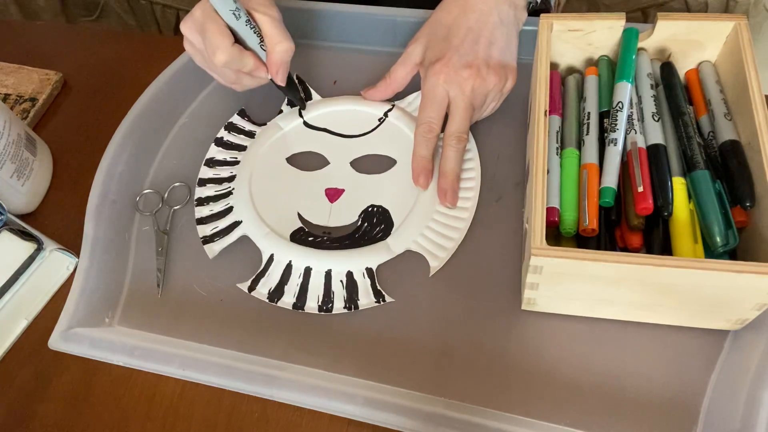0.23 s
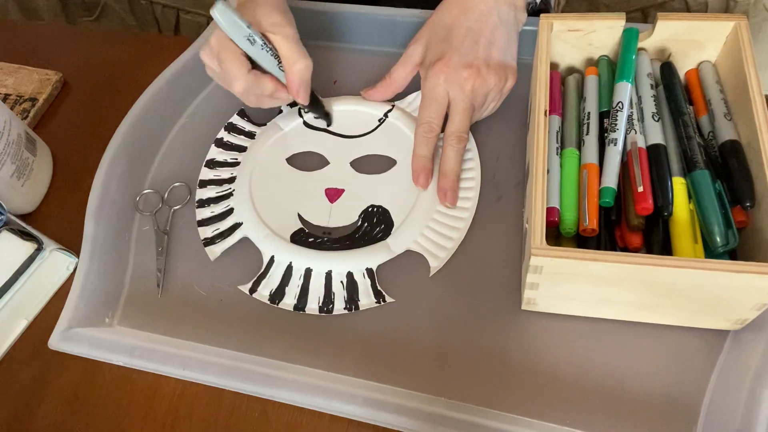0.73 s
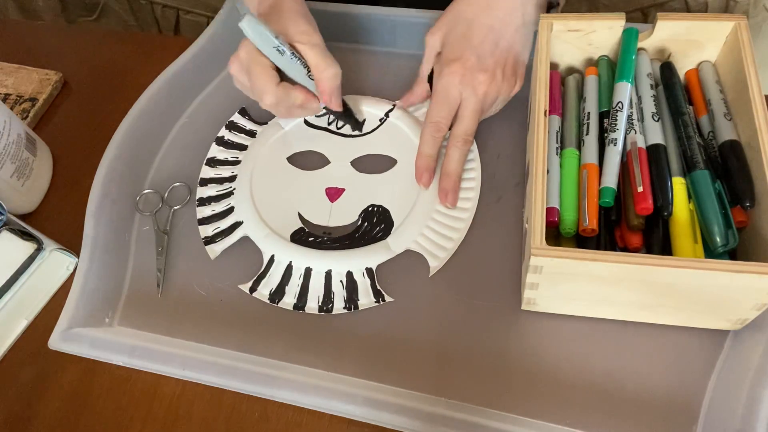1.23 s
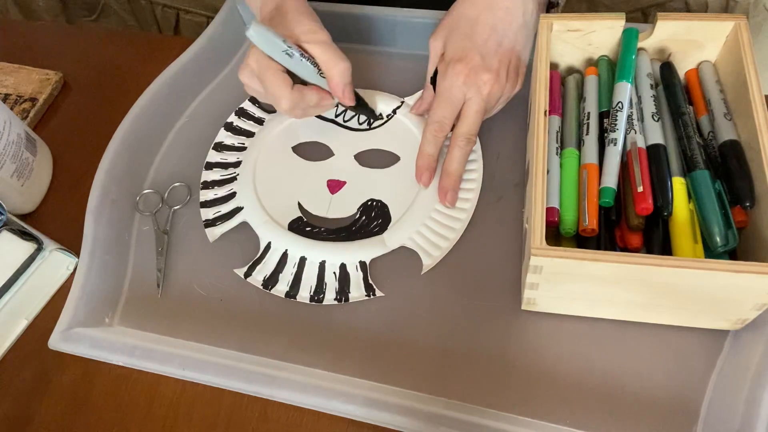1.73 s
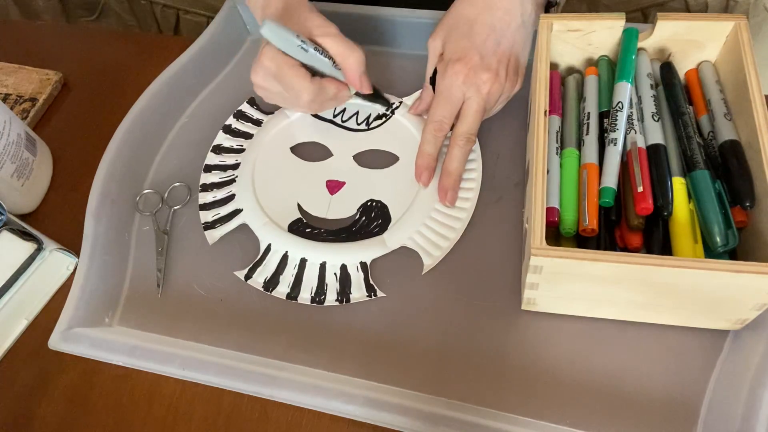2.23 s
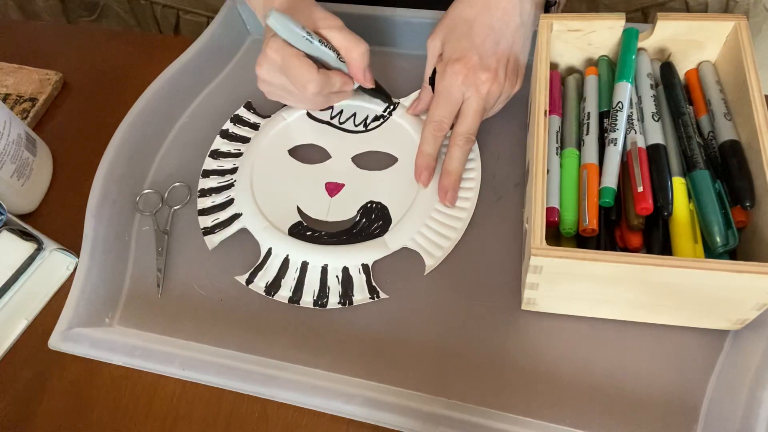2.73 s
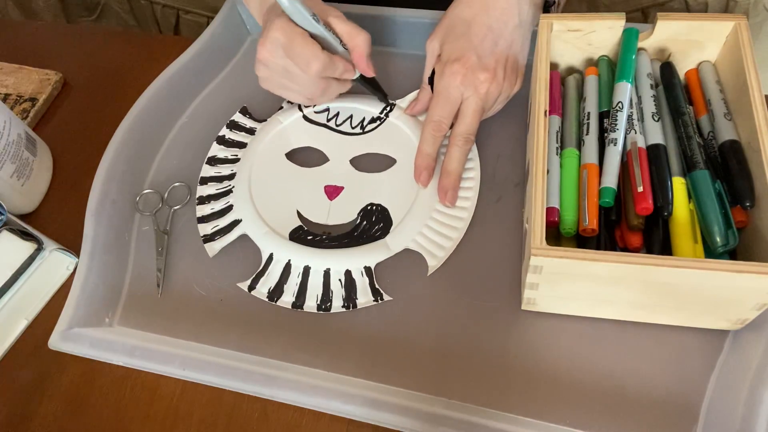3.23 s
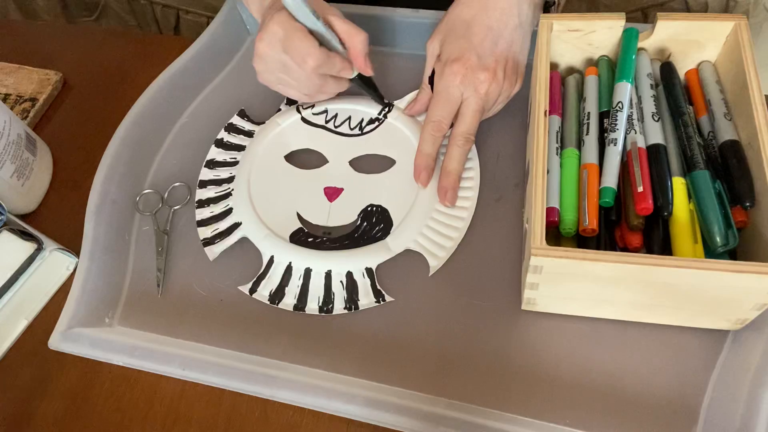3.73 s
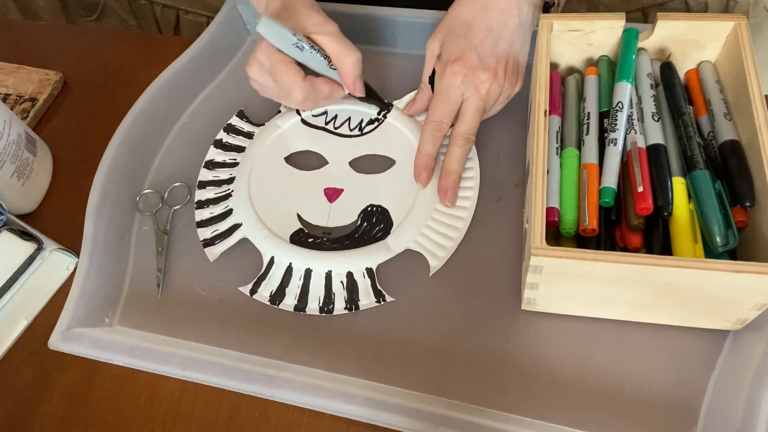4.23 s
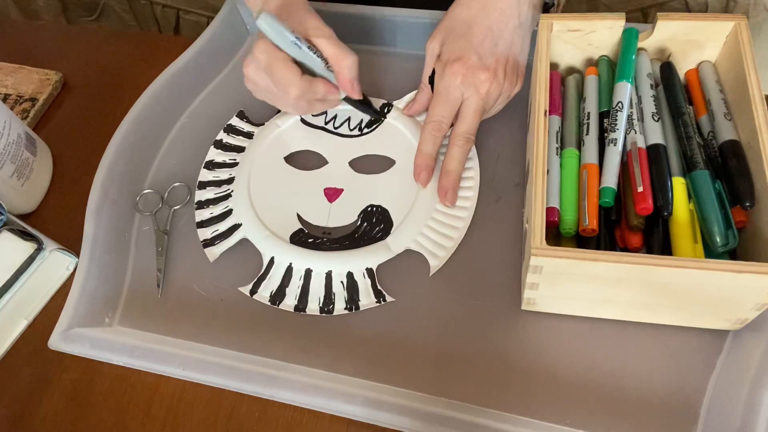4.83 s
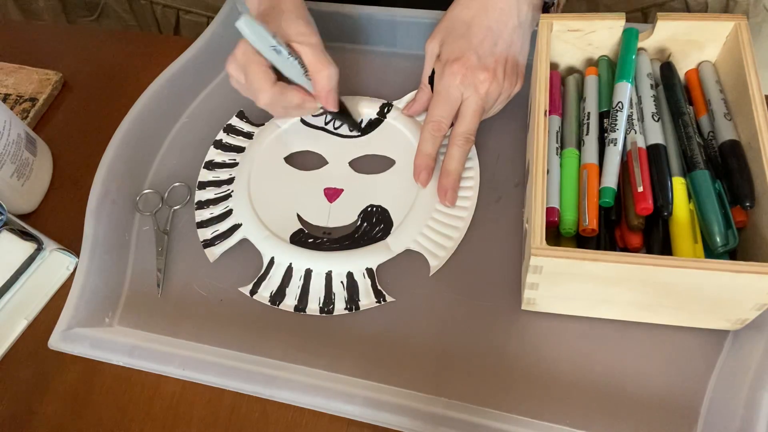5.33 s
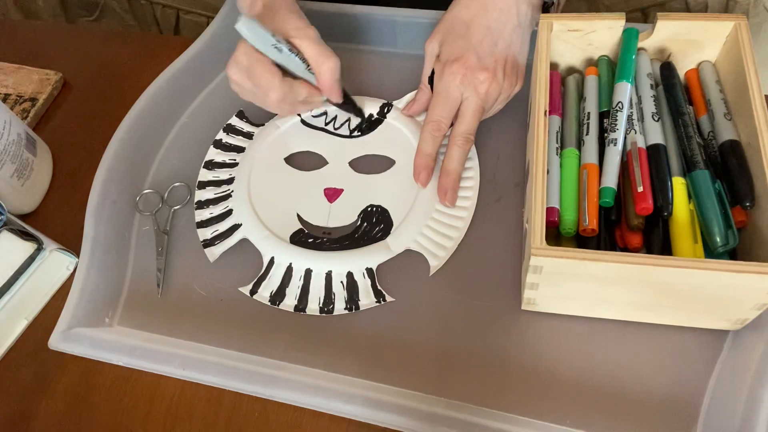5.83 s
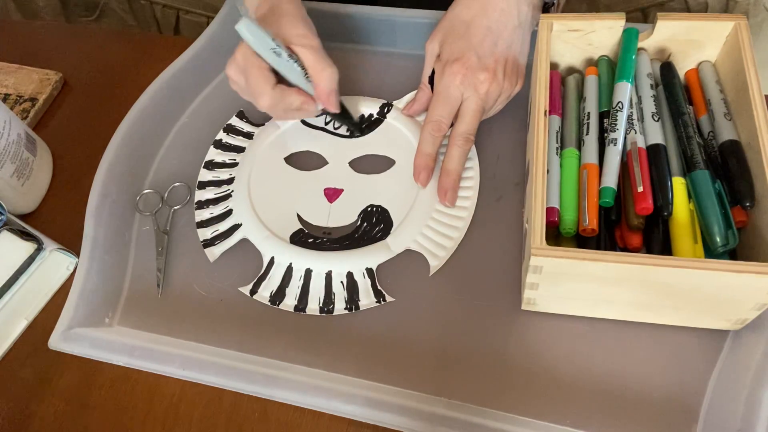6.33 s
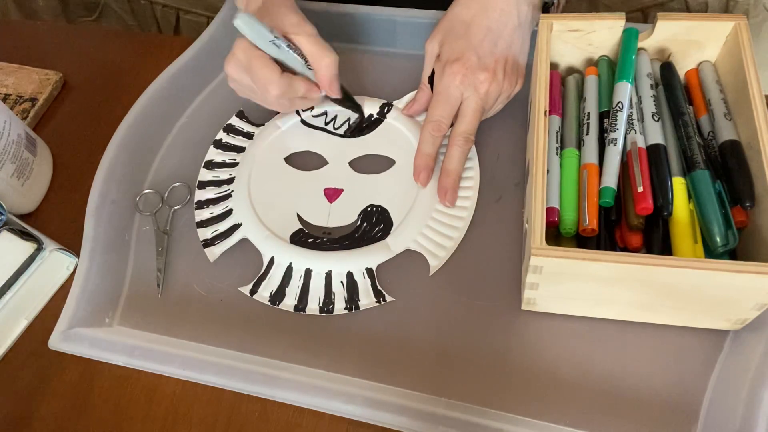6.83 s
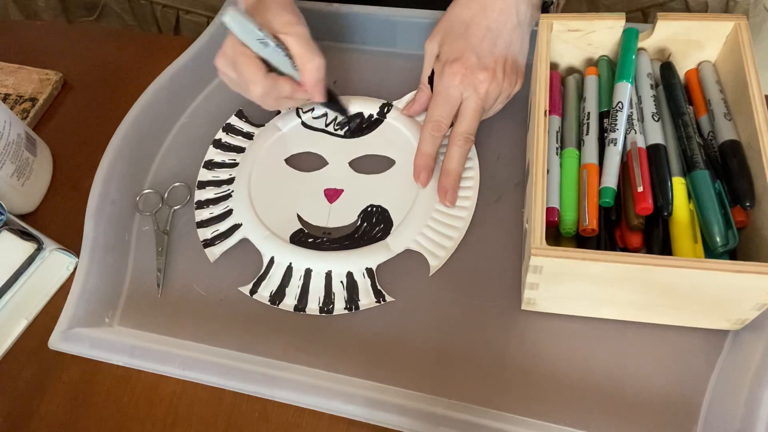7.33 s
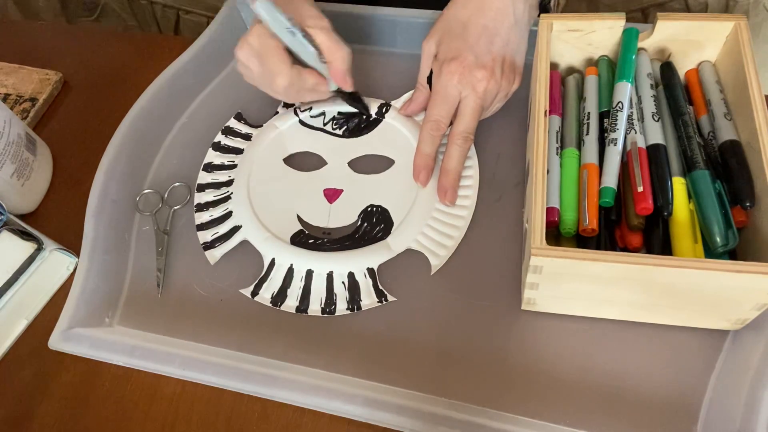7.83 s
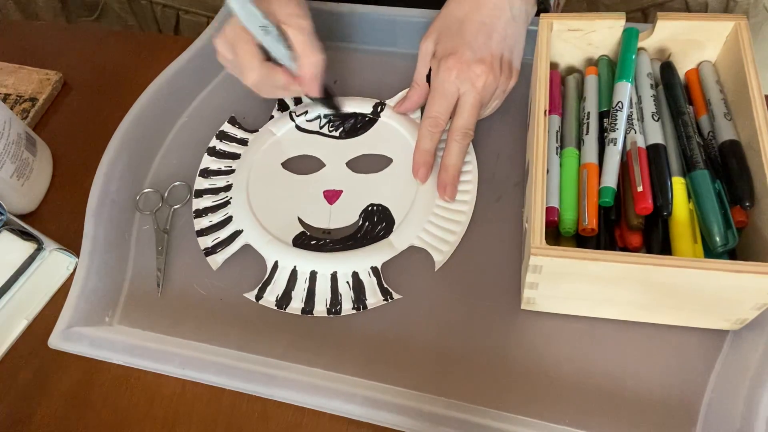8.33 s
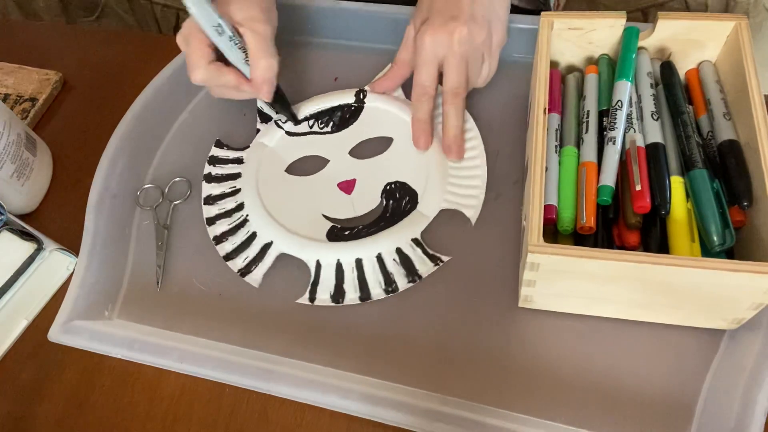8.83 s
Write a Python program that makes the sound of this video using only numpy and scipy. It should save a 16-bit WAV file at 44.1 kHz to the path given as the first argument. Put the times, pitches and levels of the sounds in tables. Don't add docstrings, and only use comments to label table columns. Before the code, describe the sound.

A close, dry stereo sound of a felt-tip marker scribbling on a paper plate resting in a plastic tray, in a quiet room. From 0 to 1.3 seconds brisk scratchy strokes alternate, some strong, around 0.5 and 1.25 s, with small ticks near 0.65 and 1.15 s. Between 1.4 and 2.4 s the strokes are lighter, with soft low tray bumps around 2 s. From 2.6 to 4.2 s they become faint and hesitant, with brief near-silences. From 4.5 s the scribbling firms up, regular and rapid through 6.3 s, then dips briefly around 6.4 s. Near 7 s the plate buckles with a hollow low pop; strong rasps follow around 7.45 to 7.8 s with a smaller pop. Dense, bright scratching continues from 8 to 9 s, with a tick near 8.9 s. Faint hum stays beneath.

```python
import sys
import numpy as np
from scipy import signal
from scipy.io import wavfile
from scipy.ndimage import uniform_filter1d

SR = 44100
rng = np.random.default_rng(int(sys.argv[2]) if len(sys.argv) > 2 else 0)


def attenuation_scalar(level_db):
    decades = np.asarray(level_db, float) / 20
    return 10 ** decades


def inscribe(sig):
    pcm = np.round(np.clip(np.atleast_2d(sig).T, -1, 1) * 32767)
    wavfile.write(sys.argv[1], SR, pcm.astype(np.int16))


N = 399987

# (time [s], level [dB])
LAST_TURN = (9.075, -49.5)


def evened(x):
    return x / np.sqrt(np.mean(x ** 2) + 1e-20)


def read(points, hz):
    f, value = np.transpose(points)
    return np.interp(np.log(hz + 1), np.log(f + 1), value)


def ports(shared, apart, hz, shift_hz=0, clear=0, facing=1):
    # (frequency [Hz], coherence [0-1])
    likeness = [(200, 0.78), (700, 0.7), (1400, 0.99), (2400, 0.65), (3300, 0.87), (5000, 0.45),
                (6300, 0.49), (7500, .96), (9000, .93), (15000, 0.96)]
    # (frequency [Hz], lead [half turns])
    left_lead = [(0, 0), (690, -.3), (1100, -.08), (3000, -.18), (3700, -.36), (4400, -.85), (4800, -.95),
                 (6100, -.88), (6500, -.7), (7000, -.28), (8100, .01), (15450, 3)]
    # (frequency [Hz], left minus right [dB])
    balance = [(60, -1.5), (550, -3), (1650, -0.1), (8000, -1)]
    hz = hz[:, None]
    alike = read(likeness, hz) + clear * np.exp(-((hz - 5500) / 1300) ** 2)
    alike = np.clip(alike, 0, .99)
    lean = attenuation_scalar(read(balance, hz) / 2)
    lead = np.exp(1j * np.pi * np.interp(hz + shift_hz * hz / 10000, *np.transpose(left_lead)))
    turned = (1 - facing) * np.exp(-((hz - 5350) / 1250) ** 4)
    lead = lead * np.exp(.8j * np.pi * turned)
    shade = attenuation_scalar(-5.0 * turned)
    left = shared * lead * lean
    right = (alike * shared + np.sqrt(1 - alike ** 2) * apart) / lean
    return shade * np.array([left, right])


def strokes():
    # (turn time [s], level at the turn [dB], early level [dB], late level [dB], plate ring under the tip [dB])
    snapped = [(0.278, -81, -47.5, -36.5, 6.5), (0.628, -57.5, -38.5, -43, 3.5),
               (0.809, -58.5, -42.5, -44.5, 1.5), (0.986, -58, -40.5, -43.5, 6),
               (1.352, -56.5, -47, -45.5, 0), (1.535, -56.5, -48.5, -52, 2.5), (2.63, -68.5, -54, -54.5, 3),
               (3.056, -64, -54.5, -56, 1.5), (3.493, -79, -51.5, -48.5, 2), (3.728, -51, -45, -50, -0.5),
               (4.16, -61, -42.5, -44.5, -1), (5.18, -67, -38.5, -41.5, 8.5),
               (5.388, -62.5, -40.5, -39, 2.5), (5.586, -61, -42.5, -38, -1), (5.791, -61, -40, -38, 3),
               (6.081, -55.5, -40, -41, 2.5), (6.297, -65, -46.5, -47, 9.5), (6.96, -59.5, -43, -36.5, 0.5),
               (7.176, -67, -41.5, -35.5, -3), (7.296, -54, -41.5, -45, 5.5), (7.445, -69.5, -42, -30, -3),
               (8.253, -39, -39.5, -36, -5.5), (8.455, -64.5, -37, -41, -1.5), (8.534, -50, -39, -36, 3)]
    # (time [s], turn [dB], early [dB], late [dB], ring [dB])
    brisk = [(0.455, -58.5, -36.5, -30, 1.5), (1.165, -58, -44, -42.5, 0.5), (1.429, -64, -47.5, -43, -1.5),
             (1.626, -70, -54, -50, 9.5), (1.756, -73.5, -46.5, -44.5, 7), (1.98, -63.5, -46, -41, -1),
             (2.316, -64, -43.5, -48.5, 1), (2.69, -63.5, -55.5, -59, 7.5), (3.14, -74, -57.5, -56.5, 5),
             (3.593, -70.5, -52, -46.5, 6), (3.858, -55, -45.5, -45, -0.5), (4.063, -54, -42.5, -47, 1.5),
             (4.256, -63.5, -44.5, -49, 1.5), (4.514, -73, -44, -37.5, 5), (4.62, -57, -43.5, -45, 7),
             (4.75, -71, -43.5, -40.5, 8.5), (4.848, -60.5, -45, -43.5, 6.5), (4.963, -68, -43, -36.5, 8),
             (5.988, -60.5, -40, -37, 0.2), (6.431, -81.5, -53.5, -49.5, 20),
             (6.557, -75, -43.5, -39.5, 10.5), (6.755, -59.5, -41, -39, -1.5),
             (7.763, -69.5, -36, -34, -4.5), (8.196, -65.5, -34.5, -41.5, 0.5)]
    # (time [s], turn [dB], early [dB], late [dB], ring [dB])
    eased = [(0.148, -51.5, -38, -56, -2.5), (0.92, -38.5, -38.5, -37, 2), (1.252, -56, -31.5, -37.5, 6.5),
             (1.872, -61, -46.5, -45.5, 4), (2.103, -57, -40.5, -45.5, 2), (2.818, -69.5, -43.5, -47.5, -3),
             (2.886, -47, -43, -60, 6), (3.281, -82.5, -49, -46.5, 3), (3.415, -62.5, -52, -55.5, 13),
             (3.8, -69, -50.5, -56, 2.5), (3.977, -54, -45, -58.5, 3.5), (5.055, -54.5, -41.5, -41, 5.5),
             (5.269, -56.5, -43, -44, 5.5), (5.464, -51.5, -41, -40.5, 4.5), (5.671, -54.5, -39, -41.5, 6),
             (5.873, -52, -41.5, -42.5, 3), (6.175, -53, -35.5, -47, 11.5), (6.845, -50.5, -39, -43.5, 2),
             (7.05, -55, -41, -45.5, 6.5), (7.594, -58.5, -39.5, -37.5, 3), (8.297, -52, -36, -40.5, 3),
             (8.662, -40.5, -34, -36, 6), (8.87, -50.5, -38.5, -38.5, 4), (8.977, -52.5, -39.5, -39, 1.5)]
    # (time [s], turn [dB], early [dB], late [dB], ring [dB])
    crept = [(0.084, -85, -46, -55, 5.5), (0.354, -41.5, -39.5, -43, -2.5), (0.552, -43, -38, -52, -4),
             (0.714, -51, -39.5, -40.5, -1), (1.07, -43.5, -43, -42, 3), (2.201, -57.5, -42.5, -42.5, 2),
             (2.392, -46, -46.5, -41, 4.5), (2.502, -51.5, -35, -50, 3.5), (2.946, -51, -41, -41, 5.5),
             (4.335, -68.5, -43, -46, 6.5), (6.648, -58.5, -42.5, -45, 8.5),
             (7.941, -64.5, -47.5, -34, 3.5), (8.033, -41.5, -36, -41, -7), (8.744, -39.5, -39, -37, 8)]
    # (snapped [ms], brisk [ms], eased [ms], crept [ms])
    speed_up_ms = (5, 10.5, 23, 45)
    # (snapped [ms/dB], brisk [ms/dB], eased [ms/dB], crept [ms/dB])
    brake_ms_per_db = (1.77, 1.9, 1.77, 1.62)
    rows = []
    for kind, rise_ms, pace in zip((snapped, brisk, eased, crept), speed_up_ms, brake_ms_per_db):
        rows += [(*row, rise_ms, pace) for row in kind]
    return np.transpose(sorted(rows))


def tip_speed_db():
    # (middle time [s], length [s], level [dB])
    presses = [(0.304, 0.023, 3.5), (0.333, 0.01, 2.5), (0.456, 0.012, 4), (0.524, 0.019, -5.5),
               (0.63, 0.017, 2.5), (0.652, 0.021, -2), (0.807, 0.018, 7.8), (0.883, 0.021, 4.5),
               (0.962, 0.013, 7), (1.257, 0.01, 6), (1.26, 0.01, -2), (1.473, 0.03, 3.7),
               (1.503, 0.017, -3.5), (2.034, 0.025, 5), (2.115, 0.021, 0.5), (2.528, 0.041, -0.5),
               (4.133, 0.024, 6), (4.174, 0.026, 2.5), (4.41, 0.047, 2), (5.074, 0.011, -1),
               (5.254, 0.03, -0.5), (5.58, 0.017, -2.7), (5.602, 0.014, 3.1), (5.65, 0.022, 10.5),
               (6.052, 0.015, 4.5), (6.2, 0.017, -5.5), (6.328, 0.042, 4), (6.822, 0.032, 4),
               (6.902, 0.013, 3.5), (7.024, 0.012, 11), (7.27, 0.01, 6), (7.339, 0.043, 2),
               (7.437, 0.0085, 6.7), (7.484, 0.016, 0), (7.65, 0.047, 3.2), (7.83, 0.022, 2.9),
               (7.871, 0.026, -4), (7.996, 0.019, 5), (8.038, 0.019, 1), (8.124, 0.018, 1.5),
               (8.195, 0.011, -10), (8.218, 0.013, -4.5), (8.263, 0.011, 2.5), (8.287, 0.043, 4.6),
               (8.53, 0.02, -1), (8.643, 0.023, -6.6), (8.879, 0.01, -3), (8.921, 0.045, 1),
               (8.95, 0.011, 5.5), (9.034, 0.013, -0.5)]
    brake_ms, brake_share = 4.6, 0.52
    s, turn_db, early_db, late_db, _, rise_ms, pace = strokes()
    end, end_db = np.append(s[1:], LAST_TURN[0]), np.append(turn_db[1:], LAST_TURN[1])
    fall_s = (brake_ms + pace * abs(late_db - end_db)) / 1000
    fall_s = np.minimum(fall_s, brake_share * (end - s))
    t = np.arange(N) / SR
    k = np.clip(np.searchsorted(s, t) - 1, 0, None)
    moving, braking = s[k] + rise_ms[k] / 1000, end[k] - fall_s[k]
    run = np.clip((t - moving) / np.maximum(braking - moving, 1 / SR), 0, 1)
    tear_db = .18 * (early_db[k] - turn_db[k]) * np.exp(-abs(t - s[k]) / .012)
    level = early_db[k] + run * (late_db[k] - early_db[k]) + tear_db
    for middle, length, db in presses:
        near = slice(round((middle - .1) * SR), round((middle + .1) * SR))
        level[near] += db * np.exp(-(2 * (t[near] - middle) / length) ** 2)
    still = np.clip((moving - t) / (moving - s[k]), 0, 1) ** 2
    stopped = 1 - np.clip((end[k] - t) / (end[k] - braking), 0, 1) ** 2
    return level + still * (turn_db[k] - level) + stopped * (end_db[k] - level)


def slips(per_s, spread_db, hiss):
    force = attenuation_scalar(spread_db * np.minimum(rng.exponential(1, N), 3.6)) * rng.choice([-1, 1], N)
    slip = force * (rng.random(N) < per_s / SR)
    clumps_db = 1.0 * evened(uniform_filter1d(rng.standard_normal(N), size=130))
    return attenuation_scalar(clumps_db) * (evened(slip) + hiss * rng.standard_normal((2, N)))


def plate_db(t, speed_db):
    # (frequency [Hz], density [dB per Hz])
    paper = [(200, -13), (500, -17), (1000, -10.5), (1500, -7), (2300, -8.5), (2900, 0.5), (4000, 0),
             (5000, 0.5), (6600, -2), (8500, 1), (11000, -3), (13500, -5), (14800, -10.5), (15900, -6)]
    # (frequency [Hz], width [Hz], level above the scratch [dB], share of the ring followed [ratio])
    plate = [(555, 196, 5.5, 0.61), (920, 140, 2.5, 0.88), (1302, 49, 5.5, -0.024), (1850, 190, 4, 0.098),
             (2570, 150, 3, -0.3), (3215, 220, 1, 0.53), (3874, 98, 4, 0.11), (5890, 710, 5.5, -0.052),
             (7460, 1210, 4.5, 0.36)]
    # (time [s], dish lifted off the tray [dB], felt dragging on dry paper [dB])
    tip = [(0.1, -1.5, -10.5), (0.33, -14.5, -6.5), (0.6, -3, -6.5), (1.0, -2, -2.5), (1.33, -1, -7),
           (1.5, -6.5, -5.5), (2.2, -10.5, -1), (3.0, -7, -4), (3.5, -9, -2.5), (4.25, -13.5, -2),
           (4.7, -6.5, -1.5), (5.3, -4.5, 0), (6.05, -7.5, 0), (6.5, -7, 0.5), (7.5, -8, -4),
           (8.2, -4.5, -5.5), (8.45, 3.5, -5.5), (9.07, -8, -0.5)]
    # (middle time [s], length [s], frequency [Hz], level above the rest [dB])
    singing = [(0.49, 0.083, 3870, 7), (0.497, 0.053, 6140, 8.5), (0.328, 0.13, 2640, 7.5),
               (0.578, 0.08, 13000, 7), (0.646, 0.029, 3680, 13.5), (0.882, 0.035, 1840, 23),
               (0.884, 0.026, 2230, 7), (0.76, 0.047, 4100, 7), (6.114, 0.068, 6200, 2),
               (1.102, 0.073, 12800, 2), (0.885, 0.042, 1260, 23.5), (0.888, 0.035, 920, 18),
               (0.964, 0.019, 1660, 21), (1.051, 0.07, 1740, 16), (1.286, 0.073, 2640, 12.5),
               (2.733, .2, 8000, -1), (2.746, 0.24, 1410, 10), (2.874, 0.089, 7900, 9.5),
               (3.4, 0.93, 1380, 5), (3.76, 0.47, 2970, 7), (4.464, 0.043, 1540, 9), (4.57, 0.04, 1460, 9),
               (4.757, 0.055, 1590, 10), (4.998, 0.091, 1630, 7), (5.023, 0.029, 1350, 14.5),
               (5.143, 0.03, 1800, 10), (5.192, 0.028, 1790, 9.5), (5.356, 0.021, 1790, 16),
               (2.1, .2, 13000, 0), (7.667, 0.095, 6060, 7.5), (6.146, .03, 1750, 11),
               (6.189, 0.033, 924, 22), (6.194, 0.049, 1740, 15), (6.35, 0.089, 1770, 6),
               (6.476, 0.12, 1740, 9), (6.583, 0.13, 1820, 8), (6.713, 0.13, 1770, 5.5),
               (6.83, 0.23, 3670, 3.5), (6.938, 0.046, 1850, 12), (8.933, 0.08, 8500, 6.5),
               (7.307, 0.1, 4200, 7), (7.366, 0.12, 1800, 4.5), (7.53, 0.039, 4280, 11.5),
               (7.553, 0.079, 6000, 7), (7.807, 0.06, 4080, 6.5), (8.339, 0.058, 8000, 8),
               (8.71, 0.037, 8100, 4), (8.808, 0.051, 8350, 8.5), (8.884, 0.026, 3400, 0)]
    singing_octaves = .22
    hz = np.fft.rfftfreq(512, 1 / SR)[:, None]
    octave = np.log2(hz / 1000 + .01)

    def below(edge):
        return 1 / (1 + np.exp(13.0 * (octave - edge)))

    turn, _, _, _, ring_db, _, _ = strokes()
    ring = np.interp(t, (turn + np.append(turn[1:], LAST_TURN[0])) / 2, ring_db)
    s, lifted, dry_felt = np.transpose(tip)
    flex = np.interp(t, s, lifted) + ring
    hiss = np.interp(t, s, dry_felt) - 0.33 * ring
    field = read([(90, -11.5)] + paper, hz) + flex * below(0.042)
    field = field + 0.85 * ring * (below(1.29) - below(0.29)) + hiss * (1 - below(2.513))
    field += 0.12 * (speed_db - uniform_filter1d(speed_db, size=90)) * (1 - below(3.2))
    stroke = np.clip(np.searchsorted(turn, t) - 1, 0, None)
    chance = rng.standard_normal((len(turn), len(plate), 2))[stroke]
    for k, (mode_hz, width, db, share) in enumerate(plate):
        centre = mode_hz * (1 + 0.035 * chance[:, k, 0])
        mode_db = db + share * ring + 2.2 * chance[:, k, 1]
        field += mode_db * np.exp(-(1.73 * (hz - centre) / width) ** 2)
    for middle, length, mode_hz, db in singing:
        moment = np.exp(-(2 * (t - middle) / length) ** 4)
        field += db * moment * np.exp(-((octave - np.log2(mode_hz / 1000)) / singing_octaves) ** 2)
    patches = rng.standard_normal((len(t), len(hz))).T
    patches = uniform_filter1d(uniform_filter1d(patches, size=3, axis=0), size=16, axis=1)
    return field + 3.2 * evened(patches)


def marker():
    # (start [s], end [s])
    in_view = [
        (0, .9),
        (1.9, 4.3),
        (7.1, 8.3),
    ]
    # (time [s], share of the full lag [ratio])
    tip_facing = [
        (0, .2),
        (.9, .3),
        (1.8, .9),
        (2.2, 1.05),
        (4.1, 1.05),
        (4.7, .75),
        (6.7, .6),
        (7.2, 1),
        (8.2, .9),
        (8.8, .5),
    ]
    hz, t, z = signal.stft(slips(4500, 3.2, 1.5), SR, nperseg=512, noverlap=384)
    z[1] *= np.exp(2j * np.pi * rng.random(z[1].shape))
    speed_db = tip_speed_db()
    colour = attenuation_scalar(plate_db(t, speed_db[np.minimum((t * SR).astype(int), N - 1)]))
    colour /= np.sqrt((colour[12:] ** 2).mean(0))
    shift_hz = 190 * evened(uniform_filter1d(rng.standard_normal(len(t)), size=40))
    clear = .36 * sum((t > start) & (t < end) for start, end in in_view)
    facing = np.interp(t, *np.transpose(tip_facing))
    spectra = ports(z[0], 2.29 * z[1], hz, shift_hz, clear, facing) * colour
    scratch = signal.istft(spectra, nperseg=512, noverlap=384)[1][:, :N]
    scratch = evened(scratch) * attenuation_scalar(speed_db + 0.5)
    tail = rng.standard_normal((2, 9000)) * attenuation_scalar(-60 * np.arange(9000) / SR / .22)
    tail = signal.lfilter([1], [1, -.9], tail)
    tail /= np.linalg.norm(tail[0])
    return scratch + attenuation_scalar(-11.0) * signal.oaconvolve(scratch, tail, axes=1)[:, :N]


def ticks():
    # (time [s], level [dB], ring frequency [Hz])
    releases = [(0.6343, -24, 3540), (0.6638, -25, 3030), (1.1358, -24.5, 2700), (1.265, -24, 2440),
                (5.5866, -25, 1800), (5.7975, -29.5, 1690), (6.5622, -29, 1670), (6.9606, -29.5, 1770),
                (7.4464, -31.5, 1240), (7.7682, -37, 3860), (0.306, -35, 2900), (0.341, -33, 2700),
                (2.03, -37, 3440), (7.657, -41, 885), (8.062, -40, 1200), (8.681, -30, 2940),
                (8.887, -25, 3200)]
    rise_cycles, fade_cycles = 0.051, 7.6
    out, t = np.zeros(N), np.arange(1200) / SR
    for s, db, hz in releases:
        cycles = hz * t
        shape = (1 - np.exp(-cycles / rise_cycles)) * np.exp(-cycles / fade_cycles)
        sound = shape * (np.sin(2 * np.pi * cycles) + 0.19 * np.sin(2 * np.pi * 1.2 * cycles))
        out[round(s * SR):][:len(t)] += attenuation_scalar(db - 7.0) * sound
    return out * attenuation_scalar([[-.8], [.8]])


def pops():
    # (time [s], low thump level [dB], ring frequency [Hz], t60 [s], upper modes above the thump [dB])
    buckles = [(0.015, -62.5, 258, 0.063, -36), (0.662, -69, 274, 0.14, 19),
               (1.135, -58.5, 150, 0.093, 11.5), (4.967, -62.5, 282, 0.12, 12),
               (5.182, -61, 248, 0.13, -10), (6.177, -53.5, 274, 0.075, 9), (6.972, -31.5, 217, 0.094, -2),
               (7.444, -60, 275, 0.052, -4), (7.655, -52, 204, 0.074, 7.5),
               (7.765, -45.5, 212, 0.075, -2.5), (8.059, -54.5, 279, 0.053, 11), (8.2, -60, 216, 0.11, -6),
               (8.455, -54, 226, 0.092, 8), (6.985, -66.5, 230, 0.08, 25.5)]
    # (frequency [Hz], level [dB], t60 [s], left lead [half turns], left minus right [dB])
    dish = [
        (313, -6, 0.12, -.1, 9),
        (468, 7, 0.039, -0.23, -1),
        (617, 11.5, 0.03, -0.56, -3),
        (815, 11, 0.026, -0.53, -4),
        (1243, 14, 0.021, -0.14, -4),
    ]
    out, t = np.zeros((2, N)), np.arange(8000) / SR
    swell = (1 - np.exp(-t / .014)) ** 2
    band = signal.butter(2, [250, 700], "band", fs=SR)
    rattle = evened(signal.lfilter(*band, rng.standard_normal(8000)))
    port = np.array([[.5], [-.5]])
    for (s, db, hz, t60, upper_db), chance in zip(buckles, rng.random((len(buckles), len(dish), 2))):
        pitch = hz * (1 + 2.39 * np.exp(-t / 0.0035))
        sound = np.sin(2 * np.pi * np.cumsum(pitch) / SR) * attenuation_scalar(15.0 - 60 * t / t60) * swell
        sound += np.sin(2 * np.pi * .65 * hz * t) * attenuation_scalar(-3.5 - 60 * t / 0.19) * swell
        sound += np.cos(2 * np.pi * hz * t) * attenuation_scalar(-1.5 - 60 * t / 0.22) * swell
        sound += rattle * attenuation_scalar(-4.5 - 60 * t / 0.16) * swell
        sound = sound * attenuation_scalar(port)
        for (mode_hz, mode_db, mode_t60, lead, lean_db), c in zip(dish, chance):
            cycles = mode_hz * (.97 + .06 * c[0]) * t
            level = lean_db * port + upper_db - 6 * c[1] + mode_db - 60 * t / mode_t60
            ring = np.sin(2 * np.pi * cycles + np.pi * lead * port)
            sound += ring * attenuation_scalar(level) * (1 - np.exp(-cycles / 3))
        part = out[:, round(s * SR):][:, :len(t)]
        part += attenuation_scalar(db) * sound[:, :part.shape[1]]
    return out


def nudges():
    # (time [s], level [dB], frequency [Hz])
    bumps = [(0.9, -53, 85.5), (0.979, -51, 137), (0.985, -61, 65), (1.08, -57, 88.5), (1.33, -54, 139),
             (1.45, -65, 50), (1.8, -56, 116), (1.92, -61, 45), (1.99, -57, 125), (2.03, -48, 61.5),
             (2.06, -58, 139), (2.19, -59, 124), (2.28, -57, 45), (2.109, -56, 45), (2.21, -51, 75.5),
             (2.3, -59, 111), (5.209, -56, 123), (5.81, -57, 71), (6.189, -62, 100), (7.46, -59, 71.5),
             (8.22, -59, 69), (8.949, -54, 64.7)]
    rise_s, t60_s = 0.0062, 0.2
    out, t = np.zeros(N), np.arange(12000) / SR
    for s, db, hz in bumps:
        swell = (1 - np.exp(-t / rise_s)) ** 2
        sound = np.sin(2 * np.pi * hz * t) * swell * attenuation_scalar(db + 7.0 - 60 * t / t60_s)
        part = out[round(s * SR):][:len(t)]
        part += sound[:len(part)]
    return out


def noise(spectrum):
    hz, _, z = signal.stft(rng.standard_normal((2, N)), SR, nperseg=4096)
    spectra = ports(*z, hz) * attenuation_scalar(read(spectrum, hz))[:, None]
    return evened(signal.istft(spectra, nperseg=4096)[1][:, :N])


def hands():
    # (time [s], rumble level [dB])
    handling = [(0.0, -72), (0.78, -76), (0.98, -60), (1.67, -69.5), (2.02, -57), (2.36, -71),
                (2.46, -73.5), (3.9, -74), (6.95, -69), (6.99, -54), (7.12, -72), (7.749, -81), (7.8, -58),
                (8.01, -77), (8.21, -67.5), (8.87, -69), (8.94, -53.5), (9.07, -82)]
    # (frequency [Hz], density [dB per Hz])
    rumble = [(12, -45), (20, -17), (54, 4.5), (129, 4), (168, -7), (206, -6.5), (242, -12), (400, -25),
              (520, -20), (880, -120)]
    s, db = np.transpose(handling)
    return noise(rumble) * attenuation_scalar(np.interp(np.arange(N) / SR, s, db) + 1.5)


def room():
    # (frequency [Hz], density [dB per Hz])
    hum = [(180, 3), (300, -15), (416, -7.5), (1370, -19), (1940, -11), (2280, -17), (2700, -29),
           (15000, -40)]
    return attenuation_scalar(-77) * noise([(20, -44), (200, -79)] + hum)


def scene():
    return marker() + ticks() + pops() + nudges() + hands() + room()


def top_cut(x):
    return signal.sosfilt(signal.butter(12, 15770, fs=SR, output="sos"), x)


def record(dry):
    both = np.array([dry[0] + dry[1], dry[0] - dry[1]])
    both = np.pad(both, [(0, 0), (1024 - 187, 3072)])
    n, at = np.arange(2048) + .5, 1024 * np.arange(N // 1024 + 2)
    lapped = np.sin(np.pi * n / 2048)[:, None] * np.cos(np.pi / 1024 * np.outer(n + 512, n[:768]))
    blocks = both[:, at[:, None] + np.arange(2048)].reshape(-1, 2048)
    z = (blocks @ lapped).reshape(2, -1, 48, 16)
    band = (z ** 2).mean(axis=3, keepdims=True)
    short_db = 2.6 * evened(uniform_filter1d(rng.standard_normal(band.shape), size=3, axis=1))
    centre = (np.arange(48)[:, None] + .5) * SR / 128
    band_db = np.interp(centre, [1000, 4000, 5000, 6300, 7500, 10000, 14000, 15500],
                        [-20, -12, -10, -9, -9.5, -4.5, -5, 0]) + short_db
    line_db = np.interp(centre, [1000, 1900, 5500, 7200, 9000, 10000, 13000, 14500],
                        [-27, -14, -18, -21, -19, -16, -14, -6]) + 2 * short_db
    top = band.max(axis=0)
    z *= (band > top * attenuation_scalar(2 * band_db)) & (z ** 2 > top * attenuation_scalar(2 * line_db))
    frames = (z.reshape(-1, 768) @ lapped.T / 1024).reshape(2, -1, 2, 1024)
    joined = frames[:, 1:, 0] + frames[:, :-1, 1]
    mid, side = np.pad(joined.reshape(2, -1), [(0, 0), (187, 1024)])[:, :N]
    return top_cut(np.array([mid + side, mid - side]))


dry = scene()
out = record(dry)
inscribe(out)
```